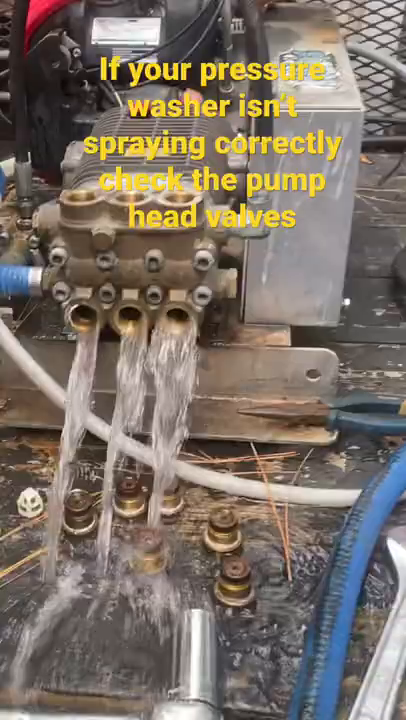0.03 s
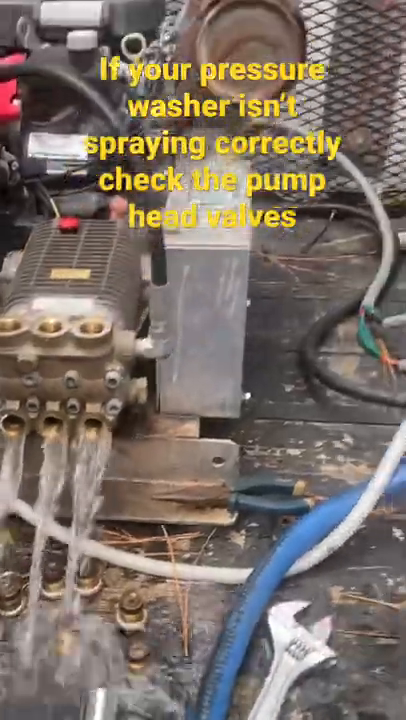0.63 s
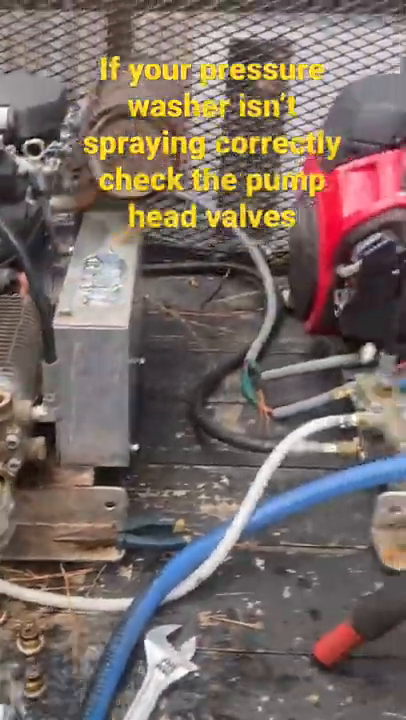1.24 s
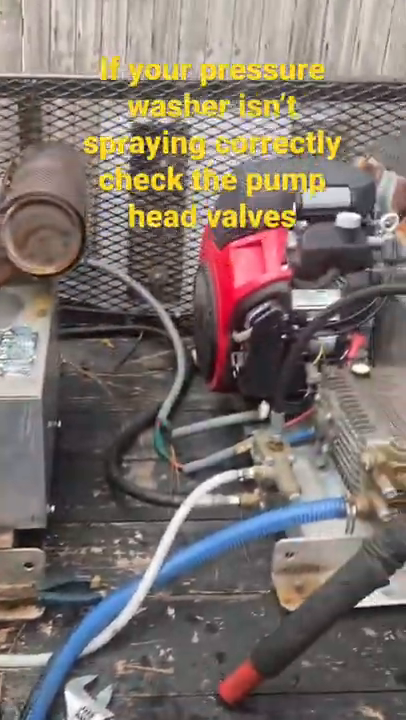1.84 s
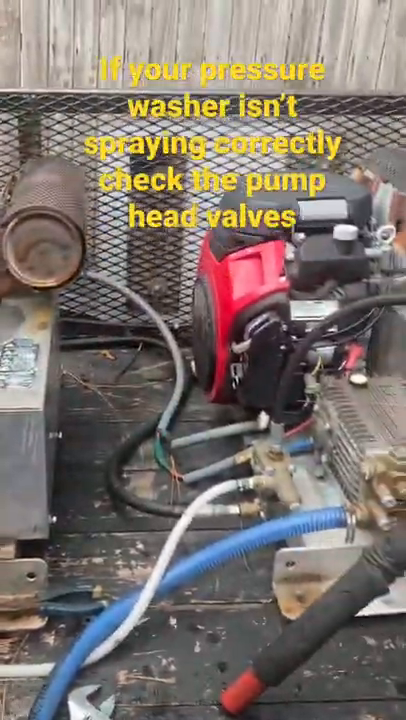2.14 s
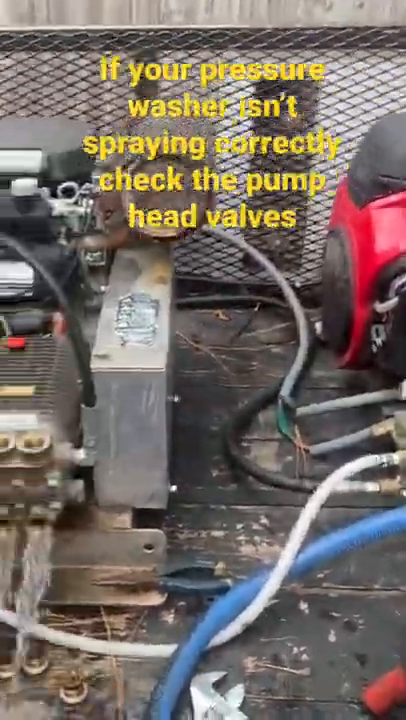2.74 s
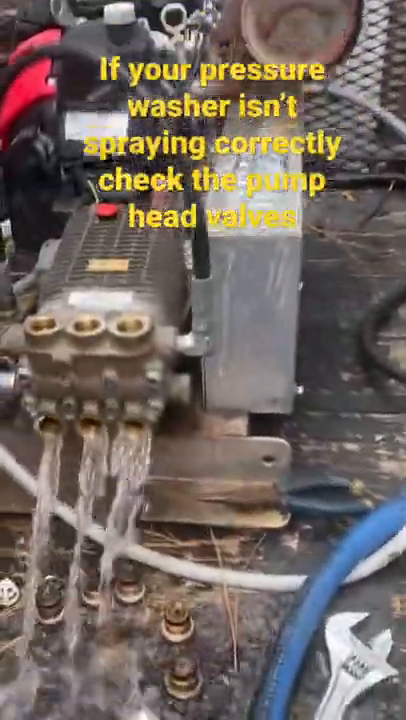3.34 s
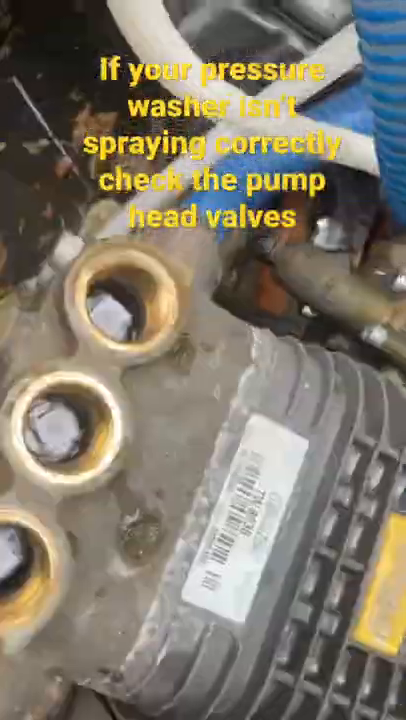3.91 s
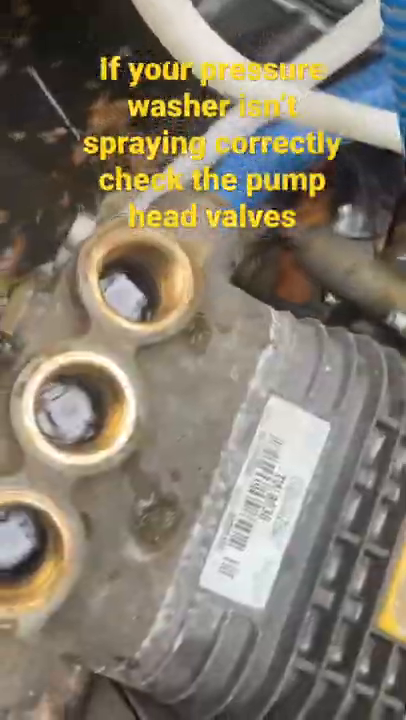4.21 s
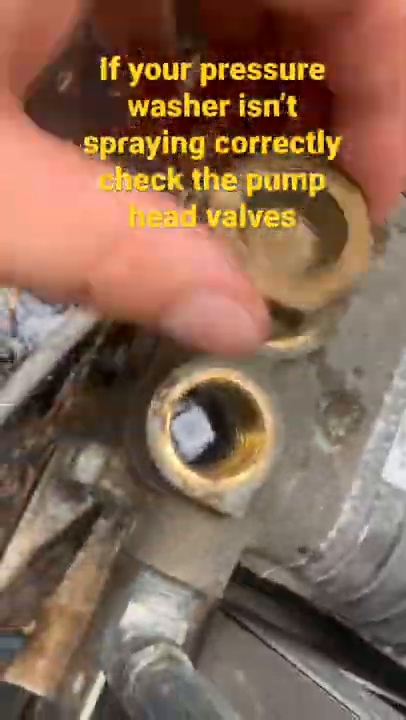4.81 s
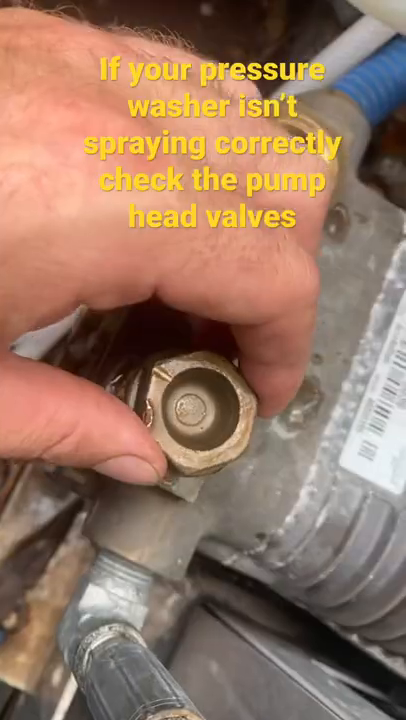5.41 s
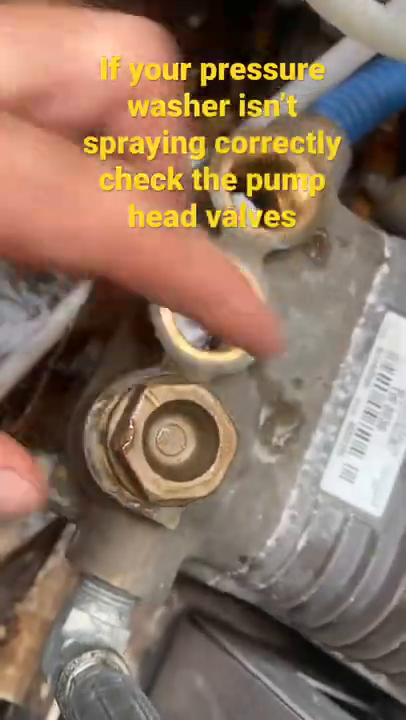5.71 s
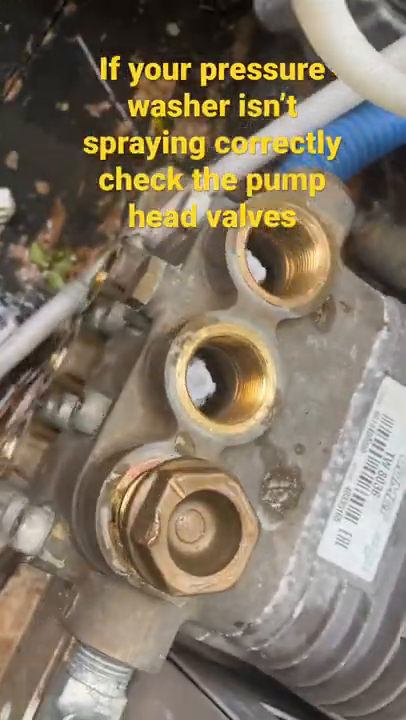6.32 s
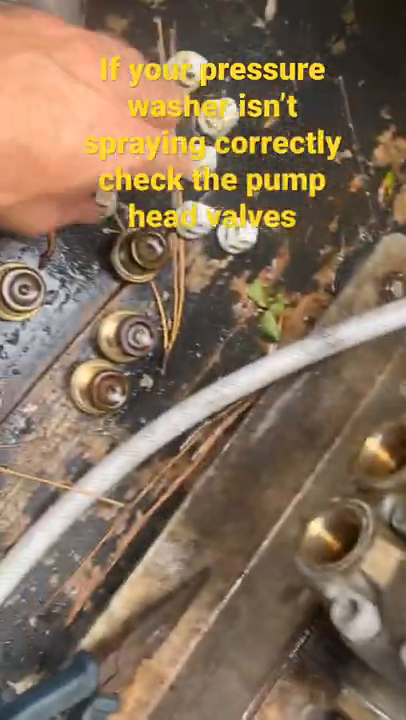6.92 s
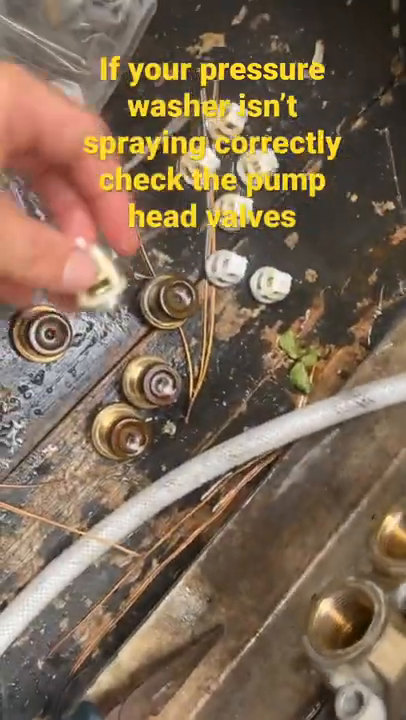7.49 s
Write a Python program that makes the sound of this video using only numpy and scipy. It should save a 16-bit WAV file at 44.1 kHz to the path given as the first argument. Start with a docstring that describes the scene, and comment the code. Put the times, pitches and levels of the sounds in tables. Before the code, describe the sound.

From the start, streams of water pour from a pump and splash steadily onto a wet wooden deck, heard from close above. The sound is bright and busy, with sharp slaps, fine spray, short bubbling plops and a low drumming of the boards. At about 3.9 seconds the water stops abruptly. A quiet yard remains, with a soft distant rumble and a weak hum, and a far bird gives four very faint falling notes until about 5.7 seconds. Between 5.1 and 5.4 seconds a brass cap knocks against the pump in a quick cluster of clanks, each ringing briefly. Around 6.5 seconds there is a faint, thin, very high squeak. From about 6.8 seconds small valves scuff and tap lightly on the boards, ending in a sharper click near 7.2 seconds before only the quiet background is left.

```python
"""Water splashes onto a wet wooden deck, falling in three streams from the open ports of a pump.
Lumps of water slap, fine drops spray, and trapped air rings as short bubbles. The water stops abruptly.
In the quiet yard a far bird calls faintly, and a brass cap knocks on the pump head and makes it ring.
After a thin, high squeak, fingers scuff and click among small valves on the boards."""
import sys
import numpy as np
from scipy import signal
from scipy.fft import rfft, irfft, next_fast_len
from scipy.io import wavfile
from scipy.ndimage import map_coordinates

SR = 44100
rng = np.random.default_rng(int(sys.argv[2]) if len(sys.argv) > 2 else 0)


def dump_mix(stems):
    """Bounce the given channels to the path in sys.argv[1] as a 16-bit WAV at rate SR."""
    frames = np.atleast_2d(stems).T  # one column per channel
    limited = np.clip(frames, -1, 1)  # hard clip at full scale
    pcm = np.round(limited * 32767).astype(np.int16)
    wavfile.write(sys.argv[1], SR, pcm)


N = 332955
TIME = np.arange(N) / SR
WATER_ON, WATER_OFF = 0.036, 3.908  # seconds

# The tone of splashing water. Each row: frequency in Hz, level in dB.
SPLASH_TONE = [(400, -22), (900, -13), (1200, -10.5), (1540, -12.5), (2110, -13), (2900, -2.5),
               (4300, -1.5), (7600, -2), (10300, -8), (13200, -1), (14700, -4), (15900, -18)]
# The big bubbles. Each row: start in seconds, relative level in dB, pitch in Hz.
BIG_BUBBLES = [(.0697, -20.5, 2010), (.1242, -24.5, 1480), (.3209, -26.5, 1620), (.5668, -25, 1740),
               (.7412, -21, 1498), (1.0052, -20.5, 2250), (1.084, -32.5, 1310), (1.3256, -23, 2410),
               (1.8633, -27.5, 1760), (2.258, -29.5, 1610), (2.9507, -24.5, 1420), (3.0185, -26, 1725),
               (3.134, -28, 1263), (3.3312, -26.5, 1675), (3.4791, -25, 1570), (3.5447, -27, 2000),
               (3.695, -26, 1680)]
# The hardest slaps of water. Each row: start in seconds, relative level in dB, pitch in Hz.
HARD_SLAPS = [(.307, -28, 13200), (.385, -13, 6200), (.444, -16.5, 4160), (.677, -21, 2480),
              (.799, -14, 4230), (1.004, -18.5, 2700), (1.099, -36, 4260), (1.226, -20, 3720),
              (1.284, -18.5, 5900), (2.115, -17.5, 11400), (2.212, -13, 8300), (2.317, -17, 11900),
              (2.342, -21, 3660), (2.725, -16, 5600), (2.750, -16.5, 3700), (2.834, -14.5, 12600),
              (2.878, -17, 5560), (2.931, -27, 5160), (3.368, -13, 4870), (3.486, -19, 3050),
              (3.876, -18, 3320)]


def amp(db):
    """Turn decibels into a gain to multiply by."""
    return 10 ** (np.asarray(db) / 20)


def unit(x):
    """Scale a sound to an average (rms) level of 1."""
    return x / np.sqrt(np.mean(x ** 2) + 1e-20)


def curves(rows):
    """Join rows that begin with a time into one curve for each further column."""
    times, *columns = np.transpose(rows)
    return [np.interp(TIME, times, column) for column in columns]


def wobble(rate, size=N):
    """A smooth curve through `rate` random values a second."""
    return map_coordinates(rng.standard_normal(int(size * rate / SR) + 4), [TIME[:size] * rate])


def filtered(x, response):
    """Filter a sound with a function that gives the gain at each frequency."""
    n = x.shape[-1]
    padded = next_fast_len(n + min(n, 8192))
    return irfft(rfft(x, padded) * response(np.fft.rfftfreq(padded, 1 / SR)), padded)[..., :n]


def coloured(x, points, size=4096):
    """Shape the tone of a sound to follow (Hz, dB) points."""
    hz, db = np.transpose(points)
    gain = amp(np.interp(np.log(np.fft.rfftfreq(size, 1 / SR) + 1), np.log(hz), db))
    # Build the filter so that it rings only after a hit, never before.
    cepstrum = irfft(np.log(gain))[:size // 2]
    cepstrum[1:] *= 2
    impulse = irfft(np.exp(rfft(cepstrum, size)))
    return signal.fftconvolve(x, impulse)[:len(x)]


def noise(points, size=N):
    """Steady noise whose tone follows (Hz, dB) points."""
    return unit(coloured(rng.standard_normal(size), points))


def resonance(f, hz, q):
    """A filter curve that peaks at hz; a higher q makes it narrower."""
    return 1j * f * hz / q / (hz * hz - f * f + 1j * f * hz / q)


def softened(x, hz, order):
    """Turn down the treble above hz, as a soft contact does."""
    return signal.lfilter(*signal.butter(order, min(hz, SR / 2 - 1000), fs=SR), x)


def placed(times, sounds):
    """Add up short sounds, one a row, at their start times."""
    index = np.round(np.abs(times) * SR).astype(int)[:, None] + np.arange(sounds.shape[1])
    return np.bincount(index.ravel(), sounds.ravel(), N)[:N]


def yard(hum_hz=120):
    """Distant rumble, a thin hiss and a weak electric hum that drops when the water ends."""
    # The tones of the rumble and the hiss. Each row: frequency in Hz, level in dB.
    rumble_tone = [(29, -26), (50, -3), (110, 2), (185, 0), (230, -4.5), (420, -14.5), (640, -16),
                   (900, -20), (2600, -27), (3300, -26), (6200, -28.5), (8250, -26.5), (14700, -35.5),
                   (15800, -51)]
    hiss_tone = [(5000, -18), (7300, -33), (8000, 0), (9500, -4.5), (10600, 0), (11300, -9.5), (15000, -33)]
    # How loud the rumble is. Each row: time in seconds, level in dB.
    rumble_levels = [(3.88, -54), (3.93, -51), (5.7, -50.5), (6.9, -48.5), (7.55, -51)]
    rumble_db, = curves(rumble_levels)
    phase = 2 * np.pi * hum_hz * TIME + .4 * wobble(3)
    hum = amp(np.where(TIME < WATER_OFF, -55, -63)) * (np.sin(phase) + amp(-6.5) * np.sin(2 * phase))
    rumble = amp(rumble_db + 0.086 * wobble(4.4)) * noise(rumble_tone)
    return rumble + hum + amp(-66) * noise(hiss_tone)


def bird(start_hz=5400, end_hz=2850, fall_s=0.055, level_db=-70.5):
    """A far bird's hoarse falling notes, each a little different, smeared by the surroundings."""
    # The start of each note in seconds.
    starts = [3.89, 4.28, 4.73, 5.58]
    t = np.arange(SR // 6) / SR
    glide = end_hz + (start_hz - end_hz) * np.exp(-t / fall_s)
    calls = []
    for _ in starts:
        hz = glide * np.exp(0.023 * rng.standard_normal()) + 150 * wobble(688, size=len(t))
        note = np.sin(2 * np.pi * np.cumsum(hz) / SR) * np.hanning(len(t))
        echoes = rng.standard_normal(len(t)) * amp(-60 * t / 0.37)
        calls.append(amp(level_db) * unit(signal.fftconvolve(note, echoes)))
    return placed(starts, np.array(calls))


def squeak(upper_ratio=1.3, upper_db=-5, rustle_db=-5):
    """A faint, very high squeak of two tones arches up and down over a soft rustle."""
    # The path of the squeak. Each row: time in seconds, pitch in Hz, level in dB.
    arch = [(6.42, 10800, -78), (6.5, 12200, -55), (6.53, 13600, -47), (6.56, 13700, -57),
            (6.59, 11700, -61), (6.65, 11200, -56), (6.74, 10100, -72)]
    hz, db = curves(arch)
    sounding = (TIME > arch[0][0]) & (TIME < arch[-1][0])
    rustle = noise([(1500, -16), (6000, -1), (9000, -12), (13000, 8), (16000, -9)])
    lower, upper = [np.sin(2 * np.pi * np.cumsum(pitch + 140 * wobble(900)) / SR)
                    for pitch in (hz, upper_ratio * hz)]
    return sounding * amp(db) * (lower + amp(upper_db) * upper + amp(rustle_db) * rustle)


def valves(lead_s=.08, grit_db=3, slide_db=-20.5, slide_s=0.027):
    """Small valves drag and tap on the boards: grit swells up to each contact and rings the wood."""
    # Each row is one touch: time in seconds, level in dB, rise in seconds, seconds to fade by 60 dB,
    # treble limit in Hz, hollow knock in dB compared with the scuff.
    touches = [(6.789, -36.5, 0.0014, 0.065, 14000, -13), (6.805, -41.5, 0.0083, 0.25, 6000, -10),
               (6.838, -35, .012, 0.14, 8000, -4), (6.921, -33.5, 0.0054, 0.089, 2170, 6),
               (7.07, -42, 0.0039, 0.037, 2500, 8), (7.128, -51.5, 0.07, 0.57, 2500, -4),
               (7.161, -24.5, 0.00038, .031, 11000, -26)]
    # The tone of a scuffed board. Each row: frequency in Hz, level in dB.
    board_tone = [(150, -25), (480, -8), (770, -6), (950, -9), (1250, 2), (1650, 0.5), (2200, -3.5),
                  (2950, -4.5), (3500, -5.5), (4400, 0), (6200, -3.5), (10000, -11.5), (13000, -7),
                  (15800, -9)]
    # How a tapped valve and its board ring. Each row: pitch in Hz, narrowness q, level in dB.
    hollow_notes = [(442, 2.8, -14), (804, 7.1, -3), (1140, 6.9, 1.5), (2920, 14, -11), (4470, 14, -34)]

    def hollow_tone(f):
        return sum(amp(db) * resonance(f, hz, q) ** 2 for hz, q, db in hollow_notes)

    t = np.arange(SR // 3) / SR - lead_s
    sounds = []
    for _, db, rise_s, fade_s, treble_hz, hollow_db in touches:
        stroke = np.where(t < 0, np.exp(-np.abs(t) / rise_s), amp(-60 * np.abs(t) / fade_s))
        slide = amp(slide_db) * np.exp(-np.abs(t) / slide_s) * (t > 0)  # the valve slides on afterwards
        catches = amp(grit_db * wobble(600, size=len(t)))  # it sticks and slips on grains of dirt
        grit, rub = rng.standard_normal((2, len(t))) * catches
        scuff = unit(softened(coloured(grit, board_tone), treble_hz, order=1))
        hollow = unit(filtered(rub, hollow_tone))
        sounds.append(amp(db) * np.maximum(stroke, slide) * (scuff + amp(hollow_db) * hollow))
    return placed(np.transpose(touches)[0] - lead_s, np.array(sounds))


def cap(ring_db=-12, clank_db=-7, echo_db=-26, frame_hz=172, frame_db=-29.5):
    """The brass cap ticks and rings the pump head; the frame thrums, and pump and deck echo each knock."""
    # Each row is one knock: start in seconds, level in dB, treble limit in Hz,
    # tick in dB compared with the knock.
    knocks = [(5.076, -13, 1970, -15), (5.109, -25, 1820, -20), (5.199, -13.5, 3900, -10),
              (5.213, -11.5, 2480, -20), (5.239, -18.5, 2430, -16), (5.245, -20.5, 2420, -6.5),
              (5.250, -15.5, 1610, -22), (5.334, -36, 1500, -20), (5.413, -34, 1150, -12)]
    # The notes of the pump head. Each row: pitch in Hz, level in dB, seconds to fade by 60 dB.
    pump_notes = [(406, -10, .11), (474, -10, .1), (528, -13, .12), (585, -14, .09), (648, -2, .085),
                  (722, -10, .09), (811, -10, .1), (991, -11, .055), (1088, -8, .065), (1226, -9, .06),
                  (1271, -9, .06), (1335, -5, .07), (1521, -3, .07), (1723, -7, .06), (1954, -8, .055),
                  (2085, -5, .055), (2202, -5, .055), (2320, -5, .055), (2363, -2, .06), (2735, -7, .045),
                  (2977, -9, .04), (3472, -11, .04), (5523, -8, .1)]
    # The tone of its short, dense clank. Each row: frequency in Hz, level in dB.
    clank_tone = [(200, -18), (450, 3.5), (1300, 2), (2400, 1), (3500, 2.5), (4600, 1), (7000, 2),
                  (15000, -10)]
    t = np.arange(SR // 2) / SR
    hz, note_db, fade_s = np.transpose(pump_notes)[:, :, None]
    blows = []
    for start, db, treble_hz, tick_db in knocks:
        strength = amp(note_db + rng.normal(0, 0.87, hz.shape)) * rng.choice([-1, 1], hz.shape)
        ring = np.sum(strength * amp(-60 * t / fade_s) * np.sin(2 * np.pi * hz * t), 0)
        clank = noise(clank_tone, len(t)) * amp(-60 * t / .06)
        tick = softened(rng.standard_normal(len(t)) * amp(-60 * t / 0.011), 3300, order=1)
        body = softened(amp(ring_db) * ring + amp(clank_db) * clank, treble_hz, order=3)
        thrum_shape = amp(-60 * t / 0.41) * (1 - np.exp(-t / 0.025))
        thrum = np.sin(2 * np.pi * frame_hz * (start + t)) * thrum_shape
        echo = softened(noise(clank_tone, len(t)), 1680, order=2) * amp(echo_db - 60 * t / .33)
        blows.append(amp(db) * (body + echo + amp(tick_db) * tick + amp(frame_db) * thrum))
    return placed(np.transpose(knocks)[0], np.array(blows))


def bursts(hz, fade_s, q, unfiltered, spray_db, spray_s):
    """Lumps of water burst: a crack and a little spray ring a shallow pocket of air."""
    t = np.arange(1024) / SR
    decay = np.exp(-t / fade_s[:, None]) + amp(spray_db) * np.exp(-t / spray_s)
    cracks = rng.standard_normal(decay.shape) * decay
    return filtered(cracks, lambda f: unfiltered + resonance(f, hz[:, None], q))


def bubbles(hz, cycles, rise):
    """Trapped air rings for a few cycles, rising in pitch as it surfaces."""
    t = np.arange(1024) / SR
    turns = hz[:, None] * t
    age = turns / cycles
    phase = 2 * np.pi * turns * (1 + rise * (1 - np.exp(-age / 2)))
    return np.sin(phase) * np.exp(-age) * (1 - np.exp(-turns))


def scattered(count, db, hz, spread_db, pitch_spread):
    """Chance events around the level curve db. Each row: start in seconds, level in dB, pitch in Hz."""
    starts = (np.arange(count) + rng.random(count)) / count * WATER_OFF
    size, pitch = np.clip(rng.standard_normal((count, 2)), -1.6, 1.6).T
    levels = np.interp(starts, TIME, db) + spread_db * size
    return np.transpose([starts, levels, hz * np.exp(pitch_spread * pitch)])


def swells(events, gain_db, fade_s, rise_share=0.065):
    """A gain that leaps up at each event and fades after it."""
    gain = np.zeros(N)
    for start, db, _ in events:
        width_s = np.where(TIME < start, rise_share * fade_s, fade_s)
        gain += amp(db + gain_db) * np.exp(-np.abs(TIME - start) / width_s)
    return gain


def spray(drops_per_s=1100, drop_db=-3.5, fizz_db=-9):
    """Fine drops tick over a fizz, and both come in flurries."""
    drops = (rng.random(N) < drops_per_s / SR) * np.clip(rng.standard_normal(N), -2, 2)
    ticks = amp(drop_db) * unit(coloured(drops, SPLASH_TONE))
    fizz = amp(fizz_db) * noise(SPLASH_TONE)
    return (ticks + fizz) * amp(1.7 * wobble(85))


def plinks(count=480, hz=4700, spread_db=4.5):
    """Rebounding drops trap tiny bubbles that ring for a few milliseconds."""
    starts = rng.random(count) * WATER_OFF
    pitch, size = np.clip(rng.standard_normal((count, 2)), -1.7, 1.7).T
    rings = bubbles(hz * np.exp(.3 * pitch), cycles=11, rise=.06)
    return unit(placed(starts, rings * amp(spread_db * size)[:, None]))


def bubbling(count, hz, pitch_spread, cycles, spread_db=1.0):
    """A crowd of bubbles of about one size bursts in the puddle."""
    starts = (np.arange(count) + 2 * rng.random(count)) / count * WATER_OFF
    pitch, size = np.clip(rng.standard_normal((count, 2)), -2, 2).T
    rings = bubbles(hz * np.exp(pitch_spread * pitch), cycles, rise=0.041)
    return unit(placed(starts, rings * amp(spread_db * size)[:, None]))


def plops(burble_db, churn_db=-2):
    """Big and middling bubbles ring while the stream churns them."""
    middling = scattered(count=14, db=burble_db + 9.5, hz=1900, spread_db=2.5, pitch_spread=0.17)
    starts, db, hz = np.vstack([BIG_BUBBLES, middling]).T
    churn = bursts(hz, np.full(len(hz), .004), q=3.5, unfiltered=.12, spray_db=-12, spray_s=.008)
    churn /= np.abs(churn).max(1, keepdims=True)
    rings = bubbles(hz, cycles=12.4, rise=0.064) + amp(churn_db) * churn
    return placed(starts, rings * amp(db - 3.0)[:, None])


def lumps(count=950, low_hz=1500, high_hz=18000, spread_db=1.5):
    """The streams break into lumps of every size that hit the film of water one after another."""
    delay, pitch = rng.random((count, 2)).T
    starts = (np.arange(count) + 2 * delay) / count * WATER_OFF
    size, length = np.clip(rng.standard_normal((count, 2)), -2, 2).T
    hz = low_hz * (high_hz / low_hz) ** pitch
    splats = bursts(hz, .0026 * np.exp(.55 * length), q=4.8, unfiltered=.13, spray_db=-9, spray_s=.009)
    return unit(coloured(placed(starts, splats * amp(spread_db * size)[:, None]), SPLASH_TONE))


def slaps(splash_db, crack_cycles=8.6, pocket_db=-6, bass_cut_hz=2100):
    """A slap cracks and rings a tiny pocket of air; the smaller the pocket, the shorter the sound."""
    lesser = scattered(count=18, db=splash_db + 5, hz=5200, spread_db=-7.0, pitch_spread=0.7)
    starts, db, hz = np.vstack([HARD_SLAPS, lesser]).T
    cracks = bursts(hz, crack_cycles / hz, q=3, unfiltered=.06, spray_db=-20, spray_s=.007)
    cracks /= np.abs(cracks).max(1, keepdims=True)
    hits = cracks + amp(pocket_db) * bubbles(hz, cycles=13.6, rise=0.054)
    bass_cut = signal.butter(2, bass_cut_hz, "highpass", fs=SR)  # the slaps carry no bass
    return signal.lfilter(*bass_cut, placed(starts + 0.0011, hits * amp(db - 0.75)[:, None]))


def water():
    """The streams drum on the deck; hard slaps throw up more splash and big bubbles stir up more burble."""
    # How strong the streams are. Each row: time in seconds, relative splash and burble levels in dB.
    flow = [(0.05, -31, -44), (0.15, -32, -38), (0.28, -34.5, -38.5), (0.76, -35, -46.5),
            (1.38, -34.5, -45.5), (1.7, -34, -49), (1.95, -35.5, -49.5), (2.22, -35.5, -46),
            (2.32, -33, -40.5), (2.53, -35, -51), (2.72, -36.5, -51), (3.53, -31, -45), (3.7, -33, -46)]
    # The tone of the boards as the water drums on them. Each row: frequency in Hz, level in dB.
    deck_tone = [(40, -8), (60, 10), (90, 11.5), (140, 2.5), (250, -6.5), (450, -2), (800, -7.5),
                 (1300, -8), (2500, -10)]
    splash_db, burble_db = curves(flow)
    splash = amp(-5) * lumps() + amp(-11) * plinks() + amp(-1.5) * spray()
    splash += amp(-13.5) * bubbling(count=600, hz=3132, pitch_spread=.25, cycles=8.7)
    splash *= amp(splash_db - 1.28) + swells(HARD_SLAPS, gain_db=-27, fade_s=0.014)
    burble = bubbling(count=700, hz=1734, pitch_spread=0.17, cycles=5.7)
    burble *= amp(burble_db - 7) + swells(BIG_BUBBLES, gain_db=-21.5, fade_s=0.011)
    streams = amp(1.06 * wobble(35)) * (splash + burble)
    deck_db = -48.5 + 0.3 * (splash_db - splash_db.mean())
    drumming = noise(deck_tone) * amp(deck_db + 2.5 * wobble(45))
    sudden_stop = np.clip((WATER_OFF - TIME) / 0.00058, 0, 1)
    return (streams + drumming + plops(burble_db) + slaps(splash_db)) * sudden_stop


def scene():
    """All sources in one channel, heard from close above the deck."""
    return (water() + cap() + valves() + bird() + squeak() + yard())[None]


def record(dry, low_hz=46.4, top_hz=15900):
    """The microphone loses deep bass; the sound opens abruptly and the highest treble is cut off."""
    thinned = signal.sosfilt(signal.butter(5, low_hz, "highpass", fs=SR, output="sos"), dry)
    opening = np.clip((TIME - WATER_ON) / .001, 0, 1)
    return filtered(thinned * opening, lambda hz: 1 / (1 + (hz / top_hz) ** 160))


dry = scene()
out = record(dry)
dump_mix(out)
```